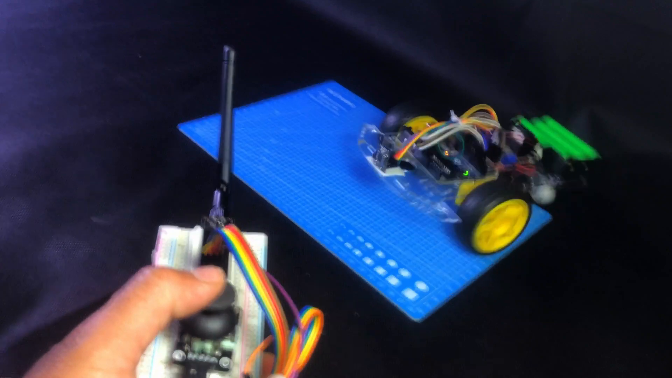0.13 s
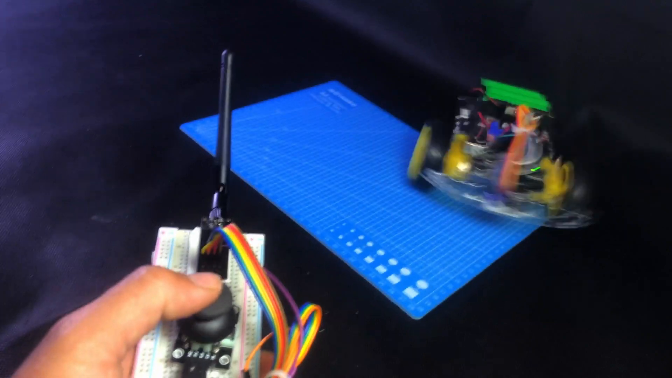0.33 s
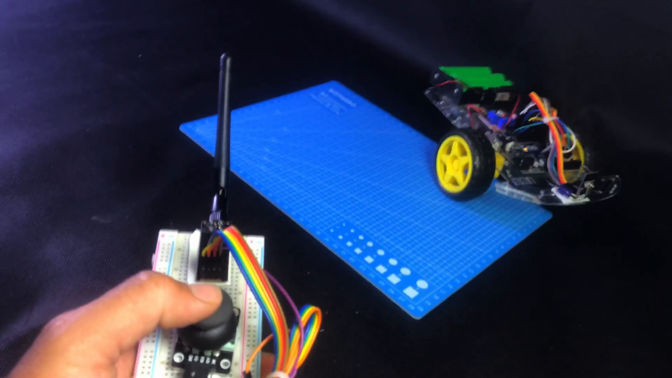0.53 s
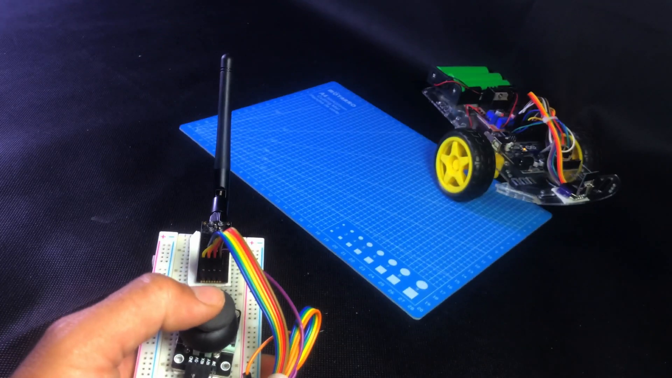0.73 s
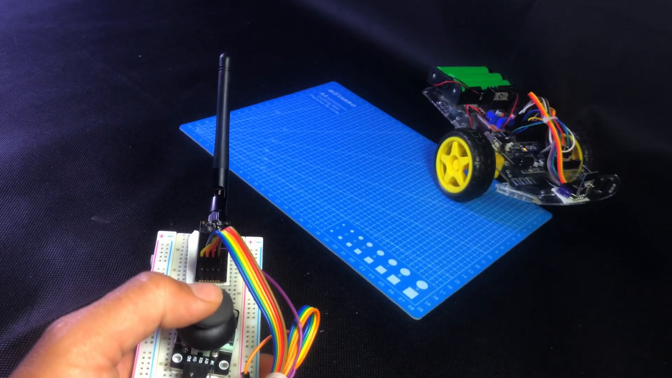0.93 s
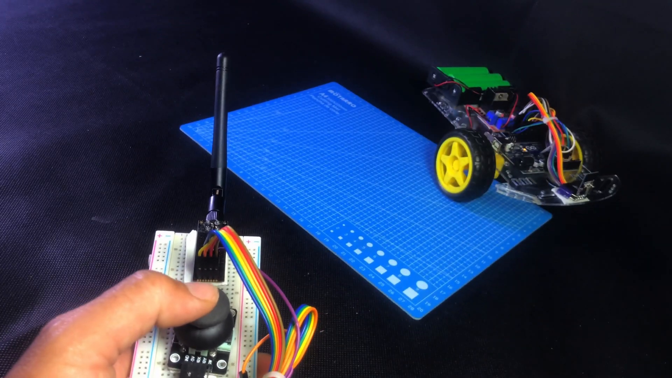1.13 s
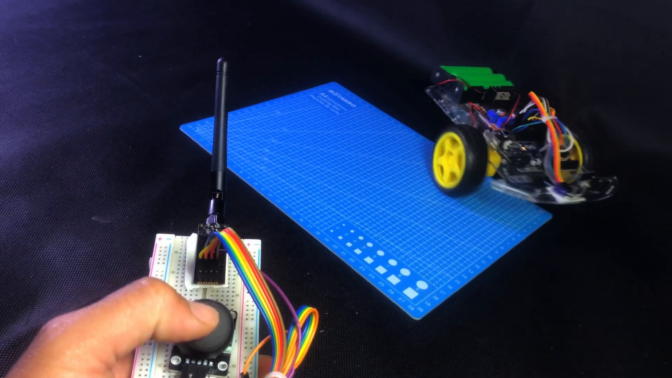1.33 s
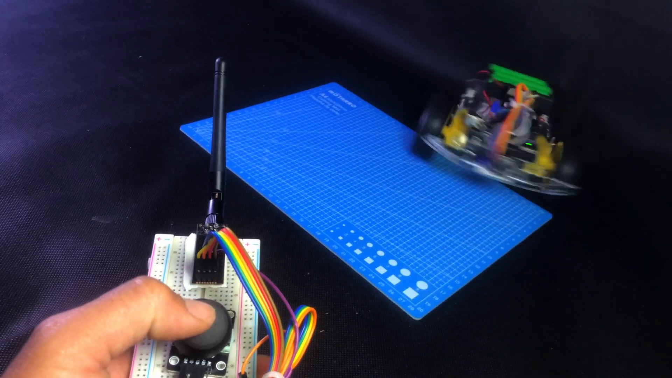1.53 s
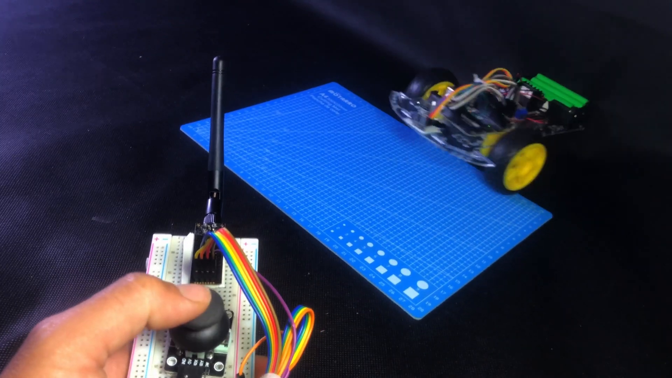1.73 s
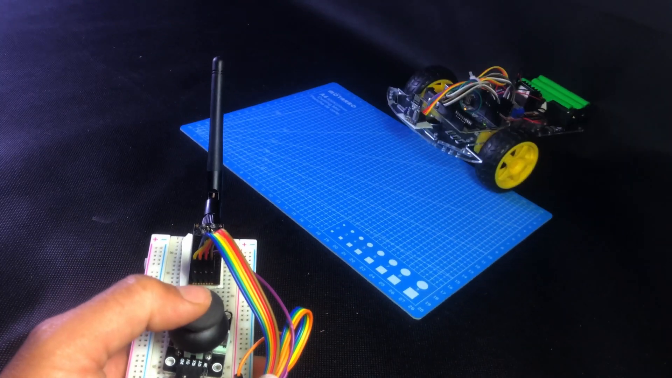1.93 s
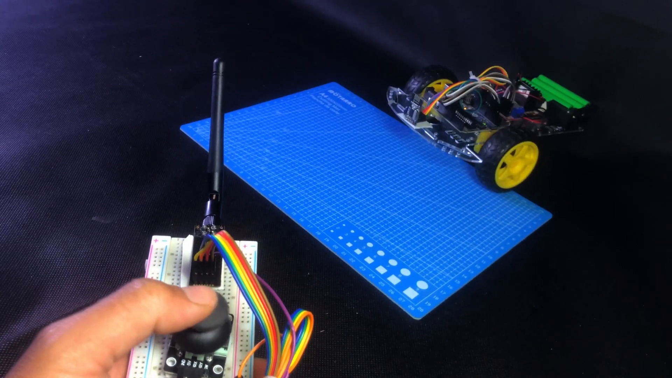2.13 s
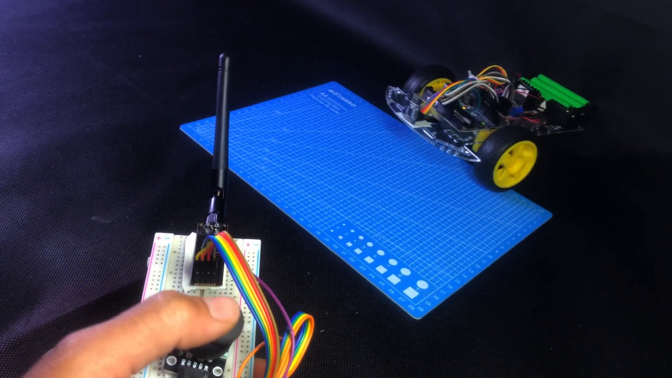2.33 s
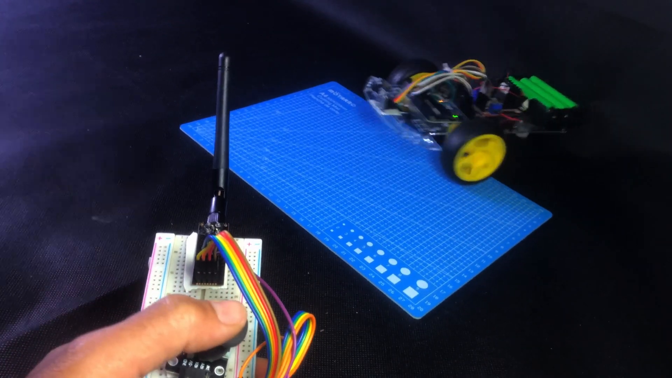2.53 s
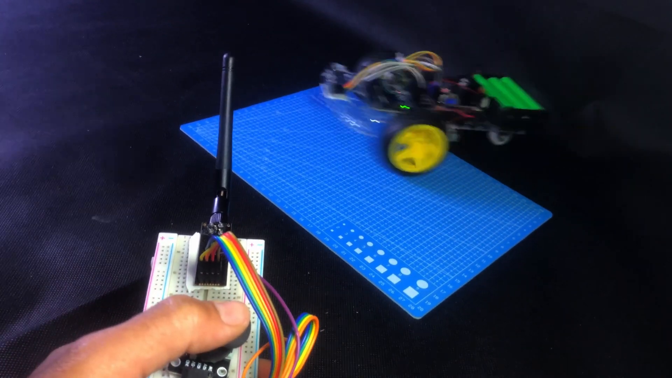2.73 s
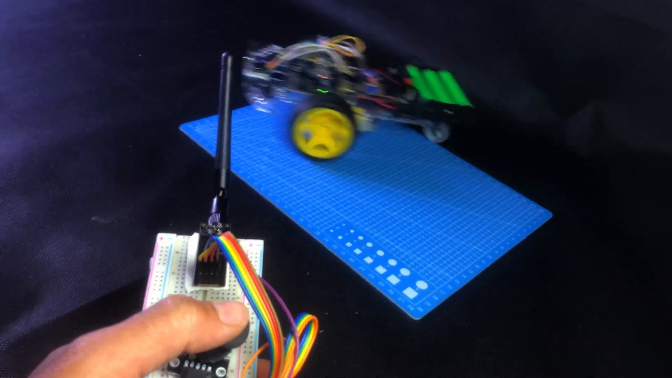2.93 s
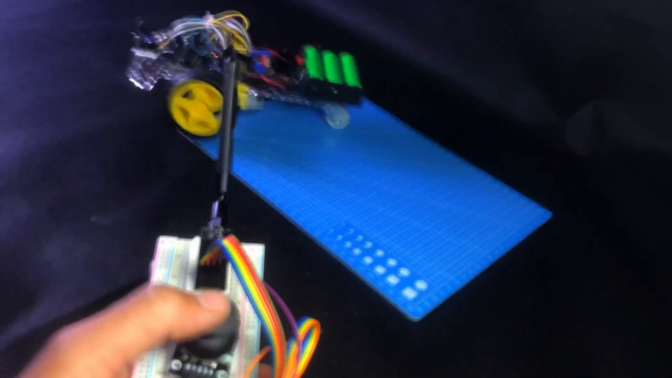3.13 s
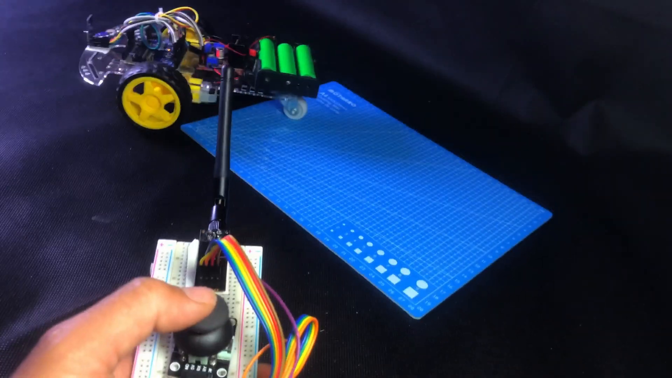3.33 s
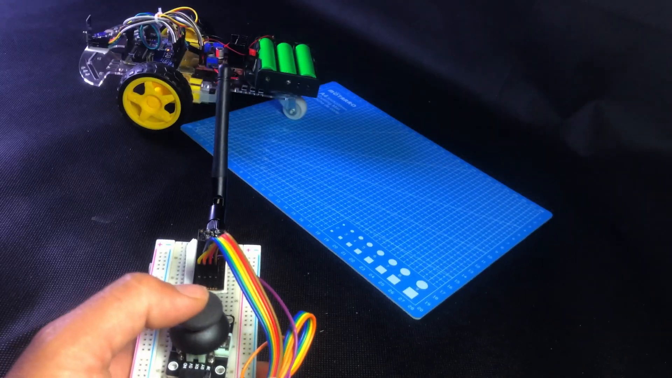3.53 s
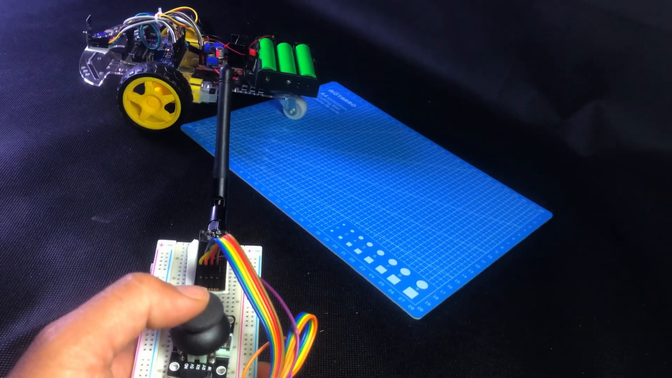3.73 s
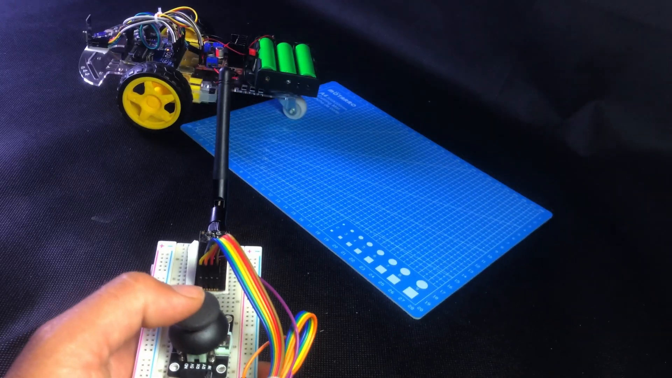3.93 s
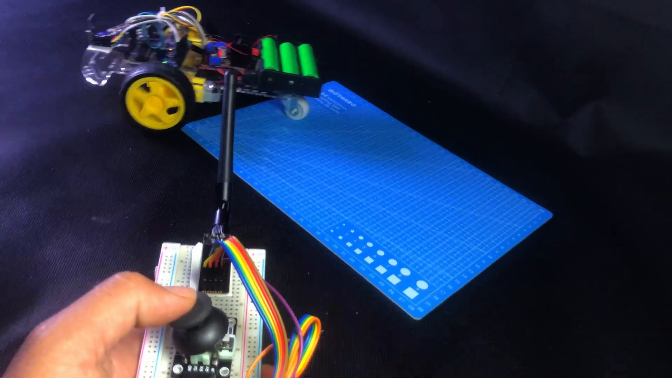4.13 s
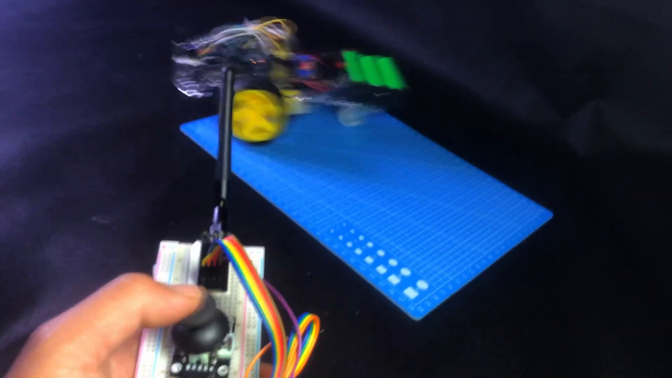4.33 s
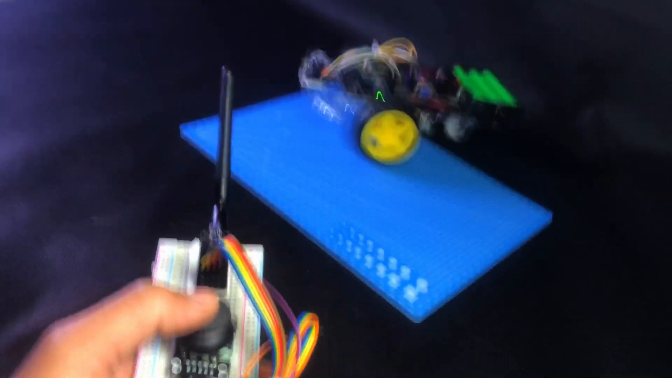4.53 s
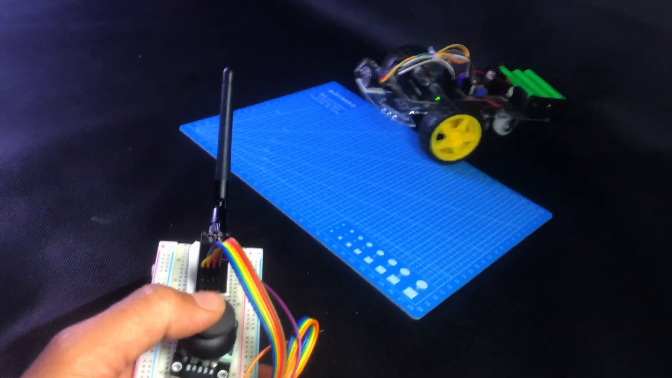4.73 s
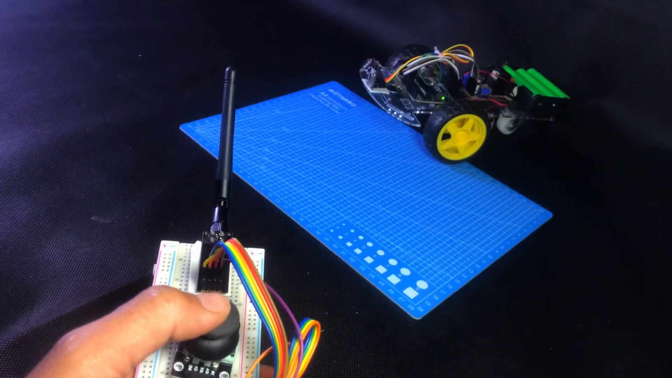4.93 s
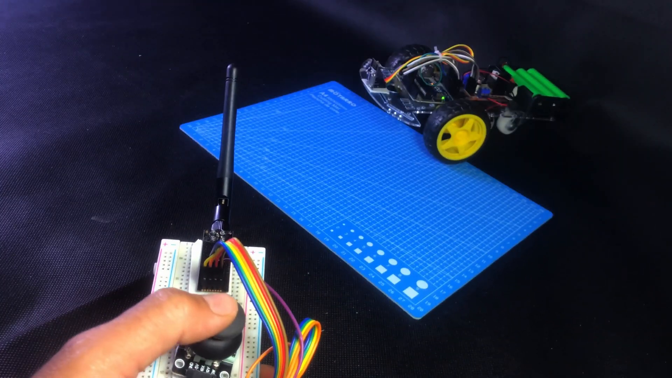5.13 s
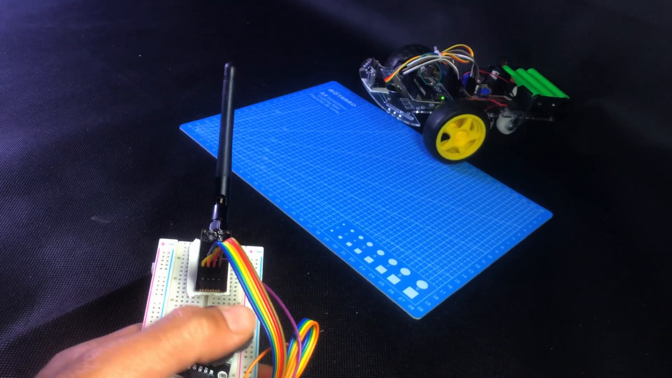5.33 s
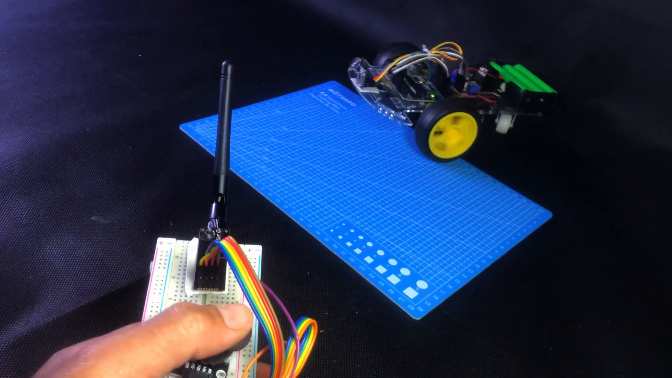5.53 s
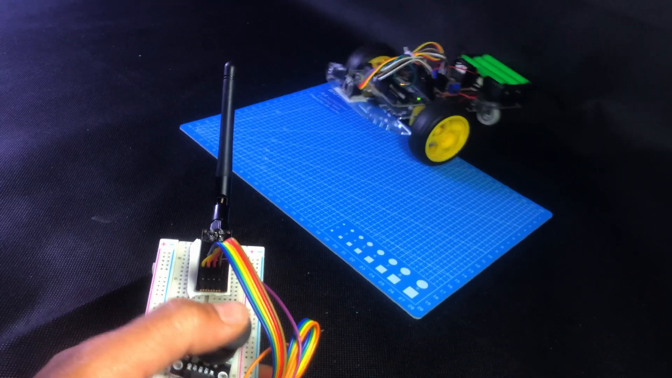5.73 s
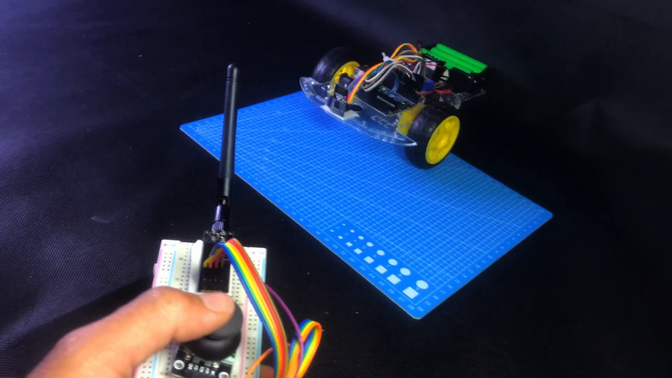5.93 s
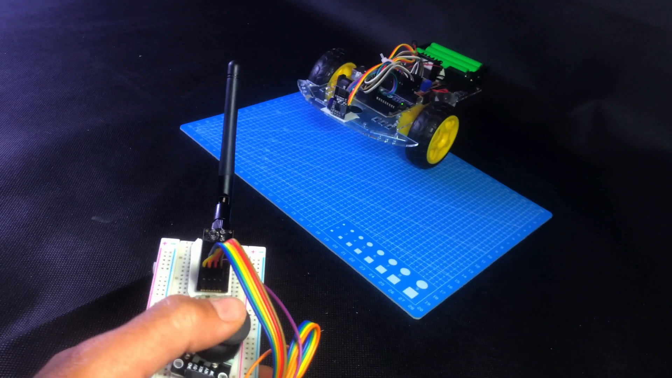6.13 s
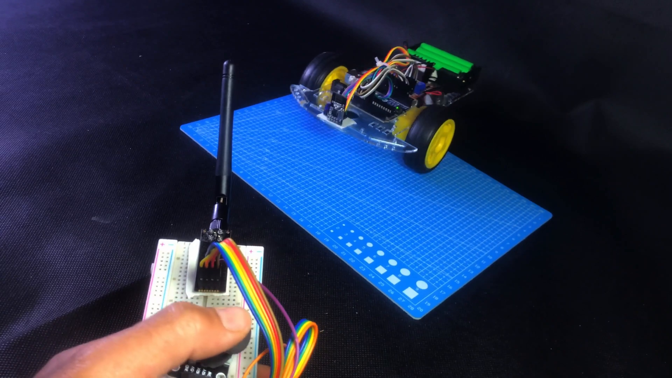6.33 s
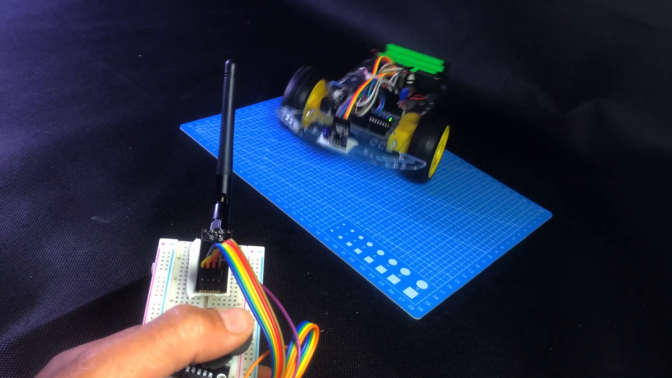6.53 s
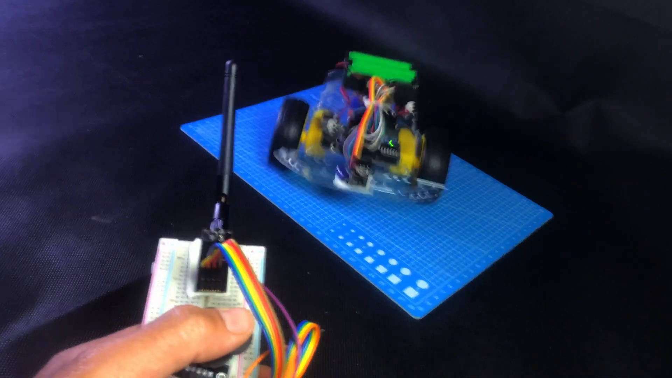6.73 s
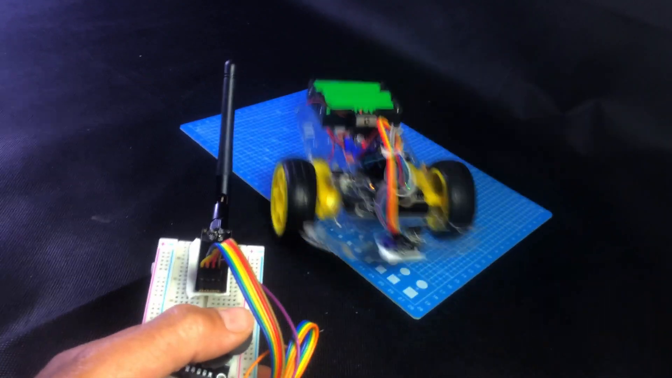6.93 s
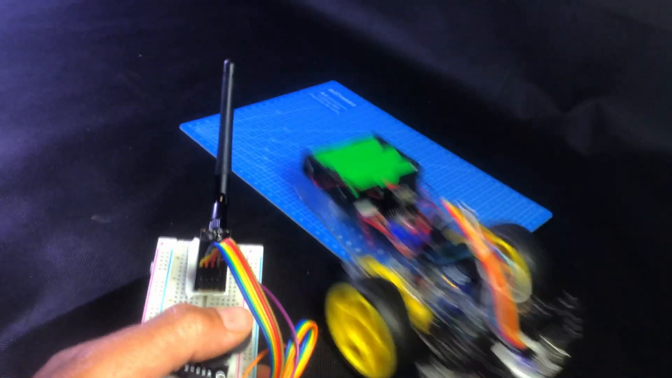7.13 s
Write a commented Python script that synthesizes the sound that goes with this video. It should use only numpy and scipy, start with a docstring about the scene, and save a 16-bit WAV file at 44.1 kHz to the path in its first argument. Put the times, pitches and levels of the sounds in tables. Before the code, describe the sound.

A small two-motor robot car on a table drives in six separate bursts. Each starts abruptly with a brief electrical whine and gear squeal, becomes a raspy plastic gear buzz over a low shaking hum, then drops quickly in pitch as the motors coast, often with clicks and caster knocks. Between bursts there is only soft room hush, faint hiss and tiny ticks. Close microphone, small dull room.

```python
"""Room hush, a flickering hiss and a thin electrical whine run throughout; a two-motor robot car makes six
bursts. Each burst opens with the whine of chopped drive current as the motors spin up; gears chatter, whine and
squeal, unbalanced rotors shake the chassis, loose parts click, the drive clicks as it switches on, and the
chassis jolts on its tyres. As the motors coast, the tail caster bounces on the table. Interference ticks come
in even spells, with strays at random times. Gears are trains of tooth impacts, tones follow the turn rate, and
struck parts are decaying modes."""
import sys
import numpy as np
from scipy import signal
from scipy.fft import rfft, irfft, next_fast_len
from scipy.io import wavfile
from scipy.ndimage import uniform_filter1d

SR = 44100
rng = np.random.default_rng(int(sys.argv[2]) if len(sys.argv) > 2 else 0)


def transcribe(signal):
    """Save signal, clipped to [-1, 1], as a 16-bit WAV file at the path in sys.argv[1]."""
    frames = np.atleast_2d(signal).T
    limited = np.clip(frames, -1, 1)
    pcm = np.round(limited * 32767).astype(np.int16)
    wavfile.write(sys.argv[1], SR, pcm)


N = 316638
TIME = np.arange(N) / SR


def undb(db):
    """Decibels to gain."""
    return 10 ** (np.asarray(db) / 20)


def unit(x):
    """Scale to rms 1."""
    return x / np.sqrt(np.mean(x ** 2))


def add(out, start_s, x):
    """Mix x into out from start_s."""
    i = max(int(start_s * SR), 0)
    out[i:i + len(x)] += x[:N - i]


def walk(rate_hz):
    """Slow chance: random levels, rate_hz per second, joined by straight lines."""
    points = rng.standard_normal(4096)
    return 1.2 * np.interp(TIME * rate_hz, np.arange(len(points)), points)


def colour(x, points, lifts=()):
    """Minimum-phase filter through (hz, db) points, plus resonances (centre_hz, width_hz, lift_db)."""
    size = 2 * next_fast_len(len(x) // 2 + 2048)
    f_hz = np.maximum(np.arange(size // 2 + 1) * SR / size, 1)
    hz, db = np.transpose(points)
    octaves_outside = np.maximum(np.log2(hz[0] / f_hz), 0) + np.maximum(np.log2(f_hz / hz[-1]), 0)
    gain_db = np.interp(np.log(f_hz), np.log(hz), db) - 24 * np.minimum(octaves_outside, 2)
    for centre_hz, width_hz, lift_db in lifts:
        gain_db = gain_db + lift_db / (1 + (2 * (f_hz - centre_hz) / width_hz) ** 2)
    # folding the cepstrum makes the filter causal
    cepstrum = irfft(np.log(undb(gain_db)))
    cepstrum[1:size // 2] *= 2
    cepstrum[size // 2 + 1:] = 0
    return irfft(rfft(x, size) * np.exp(rfft(cepstrum)))[:len(x)]


def fade(t, t60_s):
    """Exponential decay by 60 dB in t60_s."""
    return np.exp(-np.log(1000) * t / t60_s)


def ring(modes, detune):
    """Struck modes (hz, t60_s, db), randomly detuned at each blow; peak 1."""
    t = TIME[:SR // 5]
    y = np.zeros(len(t))
    for hz, t60_s, db in modes:
        struck_hz = hz * (1 + detune * rng.standard_normal())
        y += undb(db) * fade(t, t60_s) * np.sin(2 * np.pi * struck_hz * t)
    return y / np.abs(y).max()


# hush spectrum: freq_hz, gain_db
HUSH_SPECTRUM = [(15, -68), (25, -25), (43, -6.5), (64, 3), (116, -12.5), (192, -11.5), (231, -6.5),
                 (482, -14.5), (936, -19), (1180, -18), (1620, -22), (2000, -24), (2190, -22),
                 (6000, -27.5), (7800, -43), (13200, -120)]
HUSH_RMS_DB = -70.9


def room_hush():
    """Steady noise with the room's spectrum."""
    return undb(HUSH_RMS_DB) * unit(colour(rng.standard_normal(N), HUSH_SPECTRUM))


# electrical hiss spectrum: freq_hz, gain_db
HISS_SPECTRUM = [(4500, -27), (6000, -11), (7300, -2.5), (8300, 3), (9400, -4), (10300, -3), (11300, 2.5),
                 (12400, -2.5), (14300, -6), (15700, -4)]
HISS_RMS_DB = -77.5


def electrical_hiss():
    """Treble noise whose level flickers at random."""
    flicker = undb(2.2 * walk(220))
    return undb(HISS_RMS_DB) * unit(colour(rng.standard_normal(N) * flicker, HISS_SPECTRUM))


# electrical whine partials: multiple_of_whine_hz, rms_db
WHINE_PARTIALS = [(1, -90.5), (2, -91), (3, -90), (4, -91), (5, -95), (6, -92), (7, -93), (8, -103),
                  (9, -101), (10, -93.5), (11, -112), (12, -99), (13, -99), (14, -99)]
WHINE_HZ = 994.35


def electrical_whine():
    """Steady harmonics of one pitch, in random phase."""
    out = np.zeros(N)
    for k, rms_db in WHINE_PARTIALS:
        out += undb(rms_db) * np.sin(2 * np.pi * (round(k) * WHINE_HZ * TIME + rng.random()))
    return np.sqrt(2) * out


# drive bursts: on_s, off_s, aim_hz (turn rate aimed at in mid-burst), drift_hz_per_s, coast_s,
# drive_whine_db (relative), swell_db_per_s, throb_db,
# then trims: gear_db, treble_db, shake_db, drone_db, chassis_db
BURSTS = [(0.026, 0.437, 86.84, -0.5, 0.33, -61, -25, 1, -2.5, 1, 5, -4.5, 0),
          (1.336, 1.76, 79.91, 5, 0.28, -55, 12, -5, -1, 2.5, -0.5, -3.5, 1),
          (2.376, 3.14, 78.53, -5, .56, -59, 2, 1, -0.1, 1.5, 3, 2, -.5),
          (4.161, 4.46, 79.85, 0, 0.75, -69, 12, -1, -2.5, -1.5, 3, 1, 1),
          (5.39, 5.87, 86.74, -35, .36, -57.5, 25, 0.5, -1.5, -1.5, 1, -6, -1.5),
          (6.229, 7.18, 76.62, 6.5, .4, -60.5, 8, 2, .4, 2, 6.5, 4, 1.5)]
# momentary drone swells: middle_s, half_length_s, lift_db
DRONE_SWELLS = [(0.363, 0.019, 7.5), (1.73, 0.013, 9.5), (2.982, 0.083, 8)]
# layer level against motor speed: relative_db at CRUISE_HZ, rise_db_per_doubling,
# extra_fall_db per coast_s, share of swell_db_per_s
GEAR_LAW = (-49, 12.5, 26, 0.46)
TREBLE_LAW = (-61, 12, 32, 0.44)
SHAKE_LAW = (-44, 16, 12, 0.5)
DRONE_LAW = (-47.5, 25.5, 8, 0.16)
CHASSIS_LAW = (-55, 12, 15.5, 0.14)
KICK_HZ, CRUISE_HZ = 35.07, 78  # turn rates: at switch-on, reference
SPIN_UP_S, ATTACK_S = .115, 0.011  # time constants: speed, loudness
THROB_HZ = 7.84


def controls():
    """Motors approach speed exponentially, then coast down; five layer gains follow the turn rate."""
    laws = GEAR_LAW, TREBLE_LAW, SHAKE_LAW, DRONE_LAW, CHASSIS_LAW
    speed_hz, gains = np.full(N, 1. * KICK_HZ), np.zeros((len(laws), N))
    drone_lift_db = sum(db * np.exp(-((TIME - s) / half_s) ** 2) for s, half_s, db in DRONE_SWELLS)
    for on_s, off_s, aim_hz, drift, coast_s, _, swell, throb_db, *trims_db in BURSTS:
        driven_s = np.clip(TIME - on_s, 0, off_s - on_s)
        from_middle_s = driven_s - (off_s - on_s) / 2
        coasted = np.clip((TIME - off_s) / coast_s, 0, 3)  # in coasting times
        target_hz = aim_hz + drift * from_middle_s
        driven_hz = target_hz + (KICK_HZ - target_hz) * np.exp(-driven_s / SPIN_UP_S)
        hz = driven_hz * np.exp(-coasted)
        speed_hz = np.where(TIME >= on_s, hz, speed_hz)
        doublings = np.log2(hz / CRUISE_HZ)
        levels_db = []
        for (db, rise, fall, share), trim_db in zip(laws, trims_db):
            motion_db = rise * doublings - fall * coasted
            levels_db.append(db + trim_db + motion_db + share * swell * from_middle_s)
        levels_db[2] = levels_db[2] + throb_db * np.cos(2 * np.pi * THROB_HZ * driven_s)
        levels_db[3] = levels_db[3] + drone_lift_db
        turning = (1 - np.exp(-driven_s / ATTACK_S)) * np.clip(3 - coasted, 0, 1)
        gains += turning * undb(levels_db)
    return speed_hz, gains


CHOPPER_HZ = 490
WHINE_RISE_S, WHINE_FADE_S = 0.024, 0.082  # time constants


def drive_whine():
    """Chopped current makes the nearly stalled motors sing: rough harmonics, fading after each start."""
    envelope, t = np.zeros(N), TIME[:SR // 2]
    for on_s, _, _, _, _, db, *_ in BURSTS:
        add(envelope, on_s, undb(db) * (1 - np.exp(-t / WHINE_RISE_S)) * np.exp(-t / WHINE_FADE_S))
    partials_db = [2.0, -0.5, -8.5, -11.5, -49, -17, -32, -40]
    phase = 2 * np.pi * CHOPPER_HZ * TIME
    tone = np.zeros(N)
    for k, db in enumerate(partials_db, start=1):
        tone += undb(db + 3.5 * walk(70)) * np.sin(k * phase + .7 * walk(60))
    return envelope * tone


def teeth(turns, count, wear_db, scatter_db, spacing, backlash):
    """One impact per tooth: each tooth has its own size and place; play in the mesh scatters both."""
    own, chance = rng.standard_normal((2, count)), rng.standard_normal((20000, 2))
    k = np.arange(int(turns[-1] * count))
    tooth = k % count
    place_turns = (k + spacing * own[0, tooth] + backlash * chance[k, 0]) / count
    at = np.interp(place_turns, turns, np.arange(N))  # in samples
    own_size = unit(own[1] - own[1].mean())
    size = undb(wear_db * own_size[tooth] + scatter_db * chance[k, 1])
    size *= (at > 0) & (at < N - 1)
    # sinc taps place each impact between samples
    taps = at.astype(int)[:, None] + np.arange(-3, 5)
    weights = size[:, None] * np.sinc(taps - at[:, None])
    pulses = np.bincount(np.clip(taps, 0, N - 1).ravel(), weights.ravel(), N)
    return unit(pulses - uniform_filter1d(pulses, size=600))


# gearbox response: freq_hz, gain_db
GEARBOX_RESPONSE = [(350, -40.5), (600, -2.5), (766, -2.5), (966, 4), (1080, 2.5), (1450, 2.5), (1830, -9),
                    (2720, 0.5), (3160, -4), (3870, -3.5), (5080, -20), (7040, -20.5), (7640, -23),
                    (13000, -27), (15500, -32)]
# gear housing resonances: centre_hz, width_hz, lift_db
HOUSING_LIFTS = [(1203, 84, 1.5), (1604, 360, 4.5), (2730, 71, -4.5), (3450, 140, 1.5), (3770, 370, -2.5),
                 (6970, 500, 3), (9350, 600, 1), (12900, 600, -0.5)]


def gearbox(turns, gear, treble):
    """Tooth impacts and sliding friction ring the plastic housing."""
    mesh = teeth(turns, count=18, wear_db=2.5, scatter_db=3.5, spacing=0.22, backlash=0.084)
    sliding = unit(rng.standard_normal(N) * (1 + 0.46 * np.sin(2 * np.pi * turns)))
    chatter = colour((mesh + sliding / 3) * undb(1.5 * walk(45)), GEARBOX_RESPONSE, HOUSING_LIFTS)
    highpass = signal.butter(6, 4700, "high", fs=SR, output="sos")
    bright = signal.sosfiltfilt(highpass, chatter)
    return undb(-1.45) * gear * unit(chatter - bright) + undb(-3.5) * treble * unit(bright)


# gearboxes turning towards or away from the listener: time_s, rasp_lift_db
FACING_LIFT = [(0, -5.5), (1.35, -1), (1.55, 6), (1.8, -1.5), (2.4, 0), (3.0, 0), (4.3, -2.5), (5.7, -6),
               (6.4, 1), (7.18, 0.5)]


def facing(x):
    """The rasp near 4 kHz is beamed, so its level changes as the car swings round."""
    bandpass = signal.butter(1, [3400, 4400], "band", fs=SR, output="sos")
    rasp = signal.sosfilt(bandpass, x)
    lift_db = np.interp(TIME, *np.transpose(FACING_LIFT))
    return x + (undb(lift_db) - 1) * rasp


# mesh tones: multiple_of_turn_rate, relative_db, extra_db at full torque
MESH_TONES = [(17.27, -1, -17), (18.4, -31, 17), (26.32, -20, 4), (33.15, -8.5, -12), (36.84, -3, -6),
              (49.43, -9, 6)]
# plate resonances in the whine: centre_hz, width_hz, lift_db
WHINE_LIFTS = [(1130, 120, 3.5), (1740, 260, 8.5), (2780, 280, 3)]


def gear_whine(hz, turns):
    """Wavering mesh tones, rebalanced by accelerating torque; low speed and coasting weaken them."""
    acceleration_hz_per_s = uniform_filter1d(np.gradient(hz), size=1500) * SR
    torque = np.clip(acceleration_hz_per_s / 260, 0, 1)
    slack = np.clip(-acceleration_hz_per_s / 130, 0, .7)
    wobble_turns = turns + 0.013 * walk(110)
    tones = np.zeros(N)
    for k, db, extra_db in MESH_TONES:
        level_db = db + extra_db * torque + 4.4 * walk(25)
        tones += undb(level_db) * np.sin(2 * np.pi * k * wobble_turns)
    tones = tones * np.clip(hz / 68, 0, 1) ** 2 * (1 - slack)
    body = [(600, -17), (950, -6), (1400, -9), (1900, -3.5), (2700, -13.0), (4500, -7)]
    return colour(tones, body, WHINE_LIFTS)


# table response under the wheels: freq_hz, gain_db
TABLE_RESPONSE = [(26, -39), (39, -10.5), (55, 1), (75, 0), (98, 5), (118, -2), (150, -19)]
# battery deck response: freq_hz, gain_db
DECK_RESPONSE = [(105, -7), (130, 1.5), (158, 4), (185, -7), (240, -9.5)]


def shaking(hz, turns, shake, drone):
    """Rotor unbalance hums at 1x and 2x the turn rate; near cruise it outweighs the tyre rumble."""
    hum_share = np.clip(0.66 * (hz / 76) ** 4, 0, .8) * np.clip(1 - (hz - 81) / 8, .1, 1)
    out = np.zeros(N)
    for k, gain, body in ((1, shake, TABLE_RESPONSE), (2, drone, DECK_RESPONSE)):
        hum = unit(undb(1.5 * walk(20)) * np.sin(2 * np.pi * k * turns))
        rumble = unit(colour(rng.standard_normal(N), body))
        out += gain * (np.sqrt(hum_share) * hum + np.sqrt(1 - hum_share) * rumble)
    return undb(-2.06) * out


# motor plate response: freq_hz, gain_db
PLATE_RESPONSE = [(160, -22.5), (205, -9), (250, -6), (285, -7), (322, -1), (366, 3.5), (395, -6.5),
                  (430, -3), (485, -11), (560, -18), (750, -29), (1200, -31)]
# rotor overtones in the plate: multiple_of_turn_rate, relative_db
PLATE_OVERTONES = [(3, -1.5), (4, -2.5), (5, -3.5), (6, -12.5)]


def plate(hz, turns, chassis):
    """The motor plate buzzes with uneven thumps and noise; rotor overtones gain a share with speed."""
    thumps = teeth(turns * .97, count=5, wear_db=0.0, scatter_db=6, spacing=0.1, backlash=0.23)
    overtones = np.zeros(N)
    for k, db in PLATE_OVERTONES:
        overtones += undb(db + 2 * walk(13)) * np.sin(2 * np.pi * (k * turns + rng.random()))
    hum = unit(colour(unit(overtones), PLATE_RESPONSE))
    buzz = unit(colour(thumps + 0.79 * rng.standard_normal(N), PLATE_RESPONSE))
    hum_share = np.clip(0.21 * (hz / 76) ** 4, 0, .36)
    return undb(4.0) * chassis * (np.sqrt(1 - hum_share) * buzz + np.sqrt(hum_share) * hum)


# loaded-gear squeals: middle_s, pitch_hz (at the middle), glide_hz_per_s, length_s, relative_db
GEAR_SQUEALS = [(0.064, 890, 1470, 0.039, -55), (1.535, 1154, 1200, 0.15, -57),
                (2.395, 1080, 1490, 0.049, -52), (2.471, 1640, 3500, 0.068, -52),
                (4.415, 1126, 500.5, 0.073, -47), (5.462, 1630, 2492, 0.092, -53),
                (6.3, 1337, 1003, 0.053, -51)]


def squeals():
    """Loaded gears squeal: short upward sweeps with random phase roughness."""
    out = np.zeros(N)
    for middle_s, pitch_hz, glide, length_s, db in GEAR_SQUEALS:
        t = TIME[:int(length_s * SR)] - length_s / 2
        rough = np.interp(t, np.arange(-.2, .2, .004), rng.standard_normal(100))
        tone = np.sin(2 * np.pi * (pitch_hz * t + glide * t ** 2 / 2) + 1.13 * rough)
        add(out, middle_s - length_s / 2, undb(db - 1.5) * np.cos(np.pi * t / length_s) * tone)
    return out


# clicks: start_s, body_db, ring_db, snap_db (relative; 0.9-3.5, 3.5-10, 10-15 kHz); # most are loose parts, the
# rows at 5.393 and 6.2317 click as the drive switches on
CLICK_EVENTS = [(.0553, -63, -77, -51), (0.1032, -50, -57, -65), (0.1474, -42.5, -53, -63),
                (0.4484, -65, -55, -59), (2.324, -56.5, -84, -64), (2.388, -56.5, -80, -76),
                (2.4, -61, -57, -65), (4.2516, -46.5, -55, -61), (4.544, -34.5, -36, -46),
                (4.5695, -40.5, -67, -72), (4.642, -47, -49.5, -56), (4.672, -50, -77, -78),
                (5.0362, -58.5, -111, -75), (5.393, -50.5, -85, -81), (5.415, -55, -84, -77),
                (6.2317, -52.5, -95, -81)]
# body, ring and snap spectra, each: freq_hz, gain_db
CLICK_SPECTRA = [
    [(500, -22), (1000, -11), (1350, -8.5), (1900, -20.5), (2800, -9), (3300, -23), (4500, -30)],
    [(2800, -12), (3800, 12), (4800, 0), (5550, 11), (6300, 3.5), (6900, -9), (8000, 0), (9600, 2),
     (11500, -34)],
    [(8500, -10), (10700, -5), (12000, 11), (13500, -8), (16000, 5)],
]
# small metal part resonances: centre_hz, width_hz, lift_db
FITTING_LIFTS = [(980, 170, 6.5), (2970, 170, -2.5), (5850, 270, -6.5), (6500, 520, 5), (10200, 320, 0)]


def clicks():
    """Loose parts snap together, and the drive clicks as it switches on: a brief noise crack with a weaker,
    longer tail, in three bands."""
    out, t = np.zeros(N), TIME[:SR // 8]
    envelope = fade(t, 0.017) + 0.08 * fade(t, 0.35)
    for start_s, *levels_db in CLICK_EVENTS:
        for db, spectrum in zip(levels_db, CLICK_SPECTRA):
            crack = colour(rng.standard_normal(len(t)) * envelope, spectrum, FITTING_LIFTS)
            add(out, start_s, undb(db - 15.5) * unit(crack))
    return out


# chassis jolts: time_s, relative_db
CHASSIS_JOLTS = [(.135, -39.5), (.28, -44), (1.707, -44), (1.722, -38), (1.749, -40.5), (1.767, -45),
                 (3.21, -43.5), (4.554, -31), (4.578, -36.5), (4.69, -44)]
# chassis-on-tyres modes: freq_hz, t60_s, level_db
JOLT_MODES = [(54, 0.87, -6), (116, 0.063, 3.5), (263.5, 0.089, 1), (362, 0.022, 12.5), (454, 0.066, -14)]
TYRE_GIVE_S = 0.0023


def jolts():
    """The chassis jolts on its wheels; soft tyres round off each onset."""
    out, t = np.zeros(N), TIME[:SR // 5]
    give = 1 - np.exp(-t / TYRE_GIVE_S)
    for time_s, db in CHASSIS_JOLTS:
        add(out, time_s - 0.002, undb(db + 14) * give * ring(JOLT_MODES, 0.15))
    return out


# caster landings: start_s, first_bounce_db (relative), rattle_re_thud_db (relative), bounce_count, bounce_rate_hz
CASTER_KNOCKS = [(.526, -39, -30, 4, 30.9), (3.18, -37, -22, 1, 30), (3.293, -44, -20, 1, 30),
                 (3.432, -55, -25, 2, 17), (4.603, -38, -24, 1, 30), (4.636, -30, -25, 4, 29.3),
                 (6.175, -48.5, -20, 1, 30)]
# caster and plate modes: freq_hz, t60_s, level_db
THUD_MODES = [(313, 0.14, -7.5), (357, 0.021, 10.5), (460, 0.013, -17), (610, 0.016, -4)]
# caster rattle modes: freq_hz, t60_s, level_db
RATTLE_MODES = [(930, 0.21, 6), (1270, 0.033, 30), (1650, 0.045, -10), (2710, 0.012, -22)]
BOUNCE_LOSS_DB = 2.5  # per bounce
PLATE_DELAY_S, CONTACT_S = 0.00184, 0.00064


def bounces():
    """The caster drums on the table; its plate answers a moment later with a thud and rattle."""
    out, t = np.zeros(N), TIME[:SR // 5]
    contact = 1 - np.exp(-t / CONTACT_S)
    for start_s, db, rattle_db, count, rate_hz in CASTER_KNOCKS:
        for k in range(round(count)):
            thud = ring(THUD_MODES, 0.037) + undb(rattle_db + 6) * ring(RATTLE_MODES, 0.14)
            gain = undb(db + 7.5 - k * BOUNCE_LOSS_DB)
            add(out, start_s + k / rate_hz + PLATE_DELAY_S, gain * contact * thud)
    return out


# spells of regular ticks: start_s, end_s
SPELLS = [(0.7114, .76), (3.473, 6.19)]
TICK_GAP_S = .10243
TICK_DB, STRAY_TICK_DB, TICK_SCATTER_DB = -59.5, -65, 1.5  # median peak of the ring; spread


def ticks(stray_count):
    """Radio interference: a short ring with noise crackle, evenly spaced in spells, plus random strays."""
    out, t = np.zeros(N), TIME[:SR // 5]
    regular = [(s, TICK_DB) for start_s, end_s in SPELLS for s in np.arange(start_s, end_s, TICK_GAP_S)]
    strays = [(s, STRAY_TICK_DB) for s in TIME[-1] * rng.random(stray_count)]
    for start_s, db in strays + regular:
        crackle = 0.79 * rng.standard_normal(len(t)) * fade(t, 0.0087)
        gain = undb(db + TICK_SCATTER_DB * rng.standard_normal())
        add(out, start_s, gain * (ring([(1148, 0.023, 0)], 0.047) + crackle))
    return out


def room(x):
    """Small soft room: dense, dull, short reflections and a narrow band near 450 Hz that lingers."""
    t = TIME[:SR]
    tail_noise = rng.standard_normal(len(t)) * fade(t, 0.13) * (t > .002)
    tail = colour(tail_noise, [(60, -8.5), (200, -6), (500, -4.0), (3000, -5.5), (16000, -7.5)])
    linger_noise = rng.standard_normal(len(t)) * fade(t, 1.15) * (t > .02)
    linger = colour(linger_noise, [(370, -11.5), (415, -7.5), (448, 6.5), (485, -29.5)])
    response = undb(-10) * tail / np.sqrt(np.sum(tail ** 2))
    response += undb(-38.5) * linger / np.sqrt(np.sum(linger ** 2))
    return x + signal.fftconvolve(x, response)[:N]


def scene():
    """Two motors at slightly different, wandering speeds, the nearer one louder, heard in the room."""
    background = room_hush() + electrical_hiss() + electrical_whine() + ticks(stray_count=14)
    hz, (gear, treble, shake, drone, chassis) = controls()
    near_turns = np.cumsum(hz * (1 + .008 * walk(22))) / SR
    far_turns = np.cumsum(hz * (1.04 + .025 * walk(3) + .007 * walk(22))) / SR
    near_gears = undb(-4.5) * gearbox(near_turns, gear, treble)
    far_gears = undb(-6.0) * gearbox(far_turns, gear, treble)
    gears = facing(near_gears + far_gears)
    whines = drive_whine() + undb(0.5) * gear * gear_whine(hz, near_turns) + squeals()
    body = shaking(hz, near_turns, shake, drone) + plate(hz, near_turns, chassis)
    knocks = clicks() + jolts() + bounces()
    return (room(gears + whines + body + knocks) + background)[None]


TOP_HZ = 15750


def record(dry):
    """The recorder cuts the top: a steep elliptic low-pass at TOP_HZ."""
    return signal.sosfilt(signal.ellip(10, .2, 70, TOP_HZ, fs=SR, output="sos"), dry)


dry = scene()
out = record(dry)
transcribe(out)
```